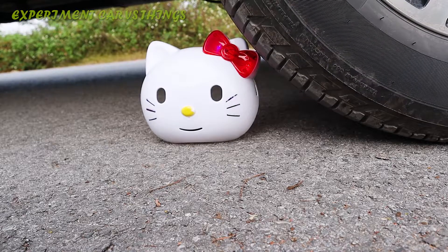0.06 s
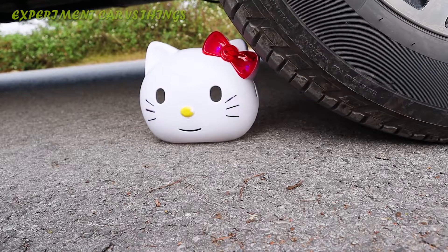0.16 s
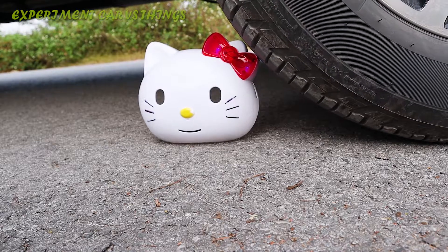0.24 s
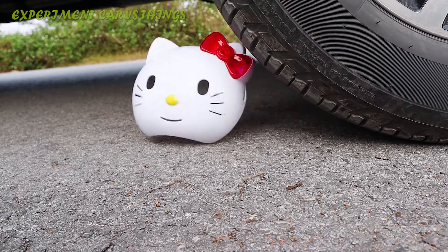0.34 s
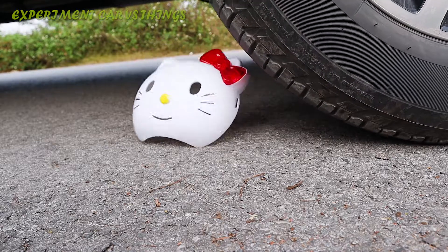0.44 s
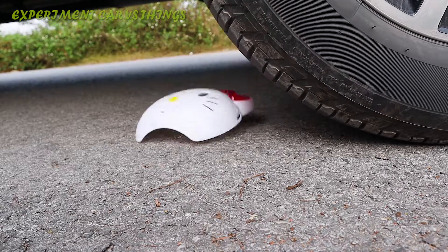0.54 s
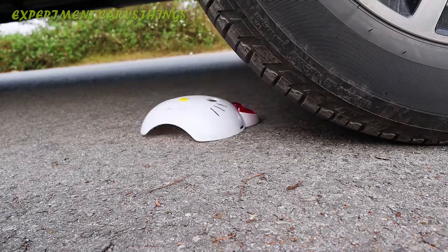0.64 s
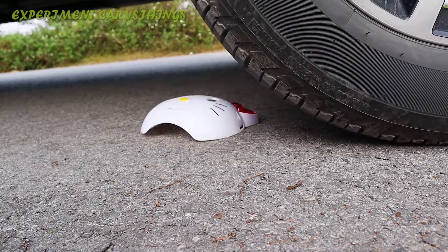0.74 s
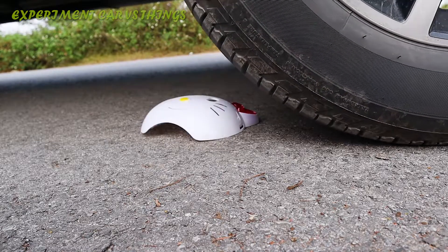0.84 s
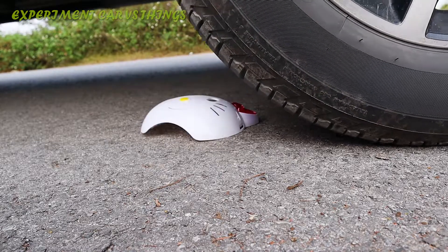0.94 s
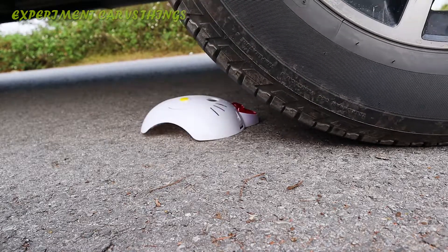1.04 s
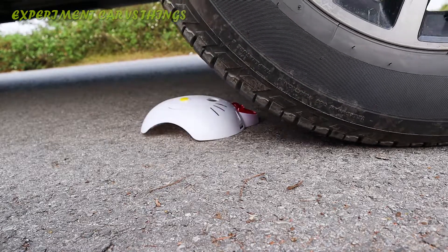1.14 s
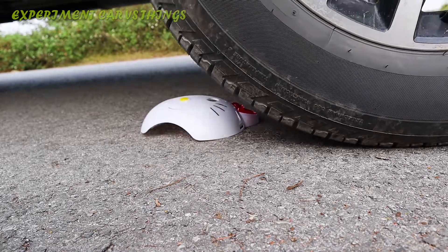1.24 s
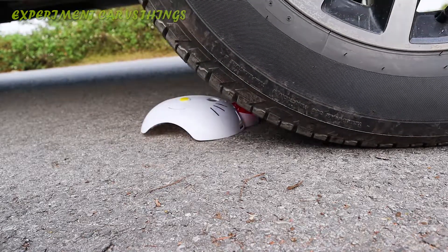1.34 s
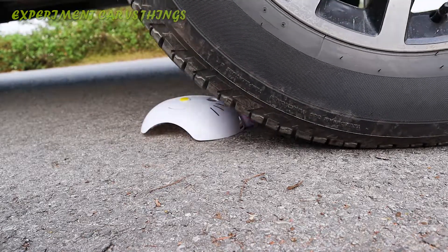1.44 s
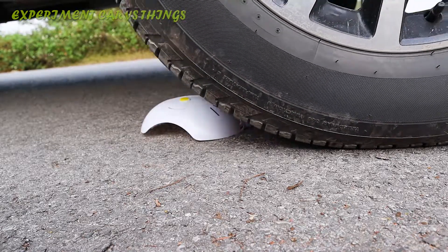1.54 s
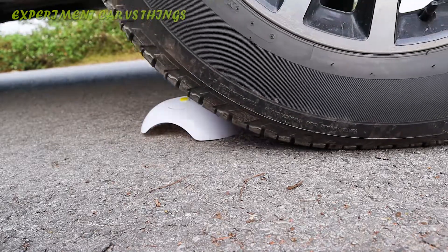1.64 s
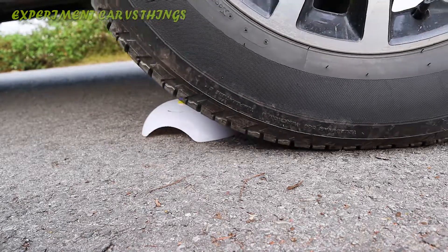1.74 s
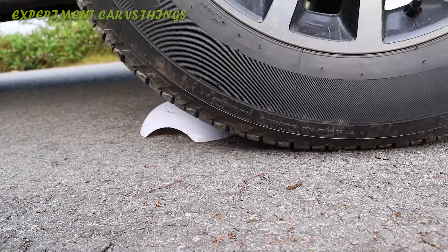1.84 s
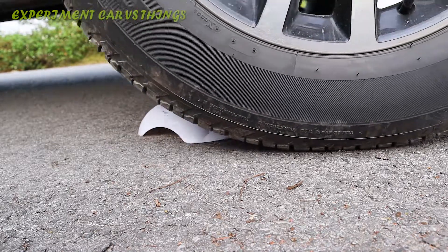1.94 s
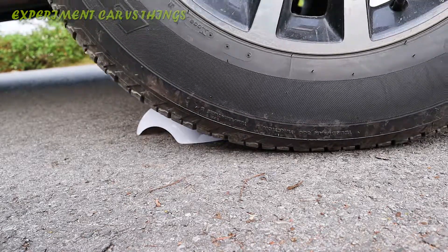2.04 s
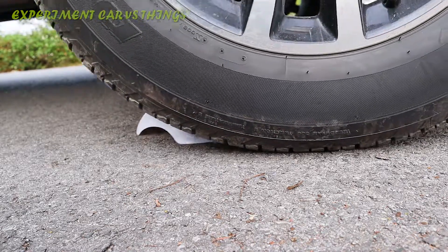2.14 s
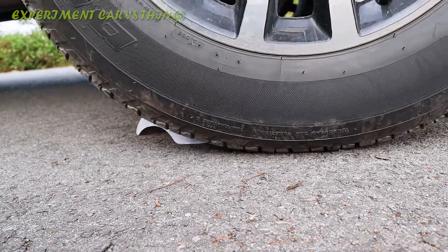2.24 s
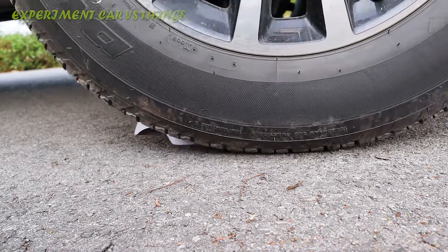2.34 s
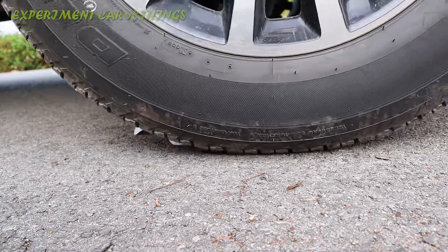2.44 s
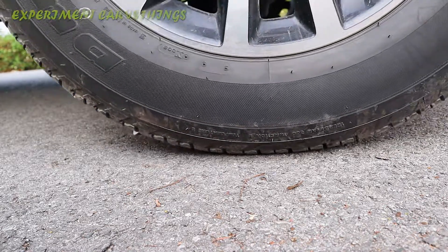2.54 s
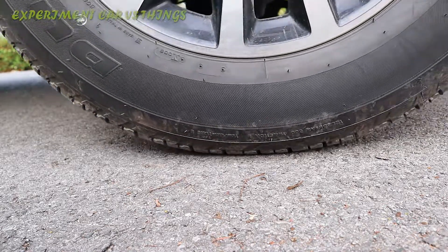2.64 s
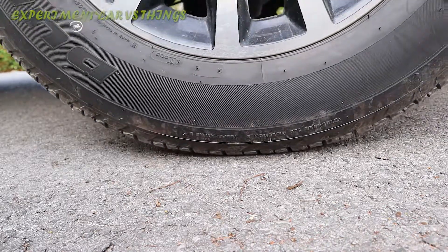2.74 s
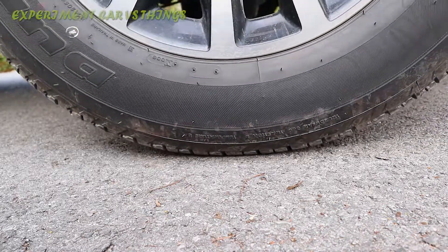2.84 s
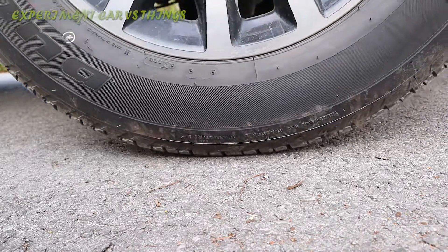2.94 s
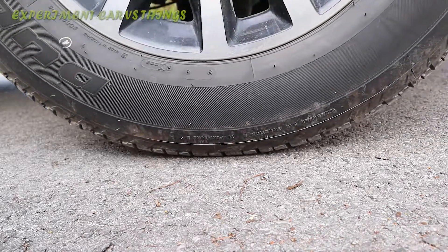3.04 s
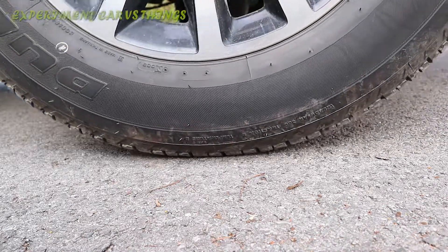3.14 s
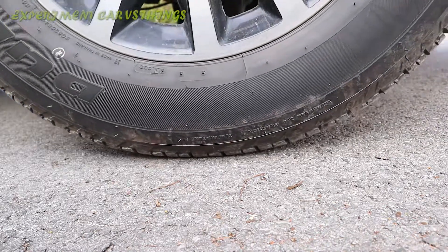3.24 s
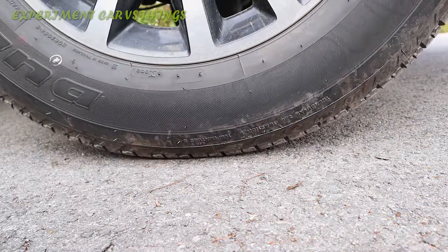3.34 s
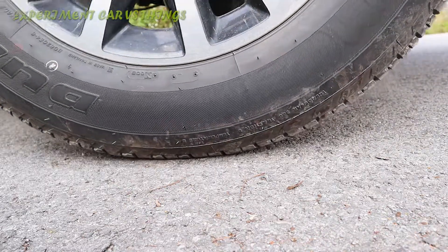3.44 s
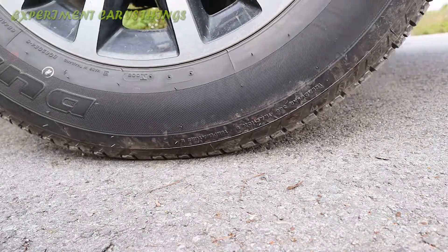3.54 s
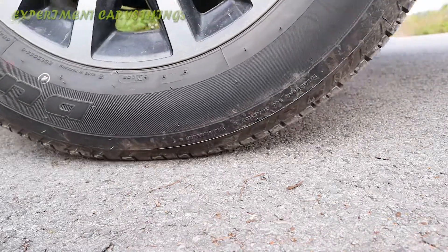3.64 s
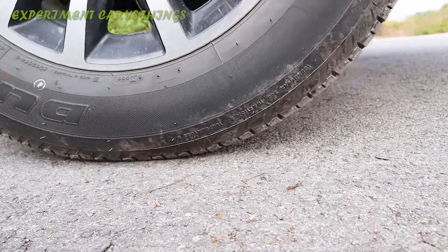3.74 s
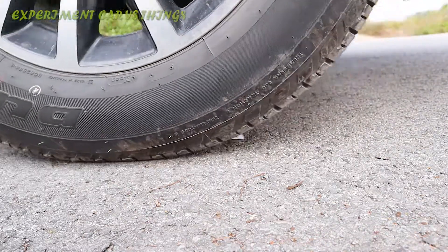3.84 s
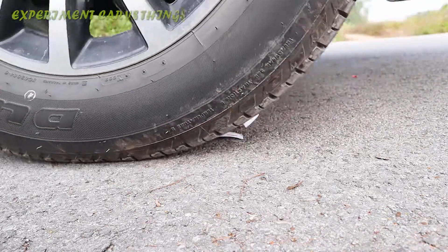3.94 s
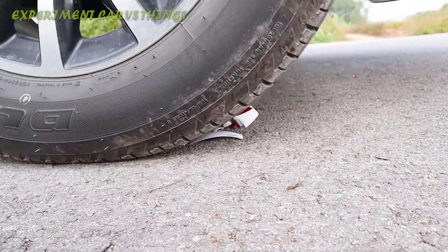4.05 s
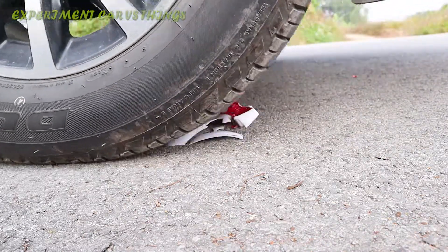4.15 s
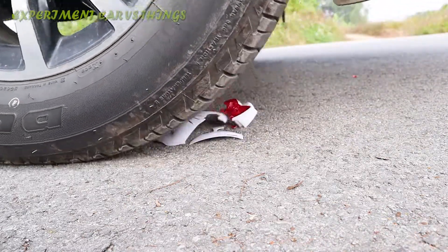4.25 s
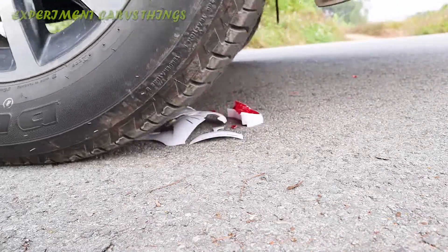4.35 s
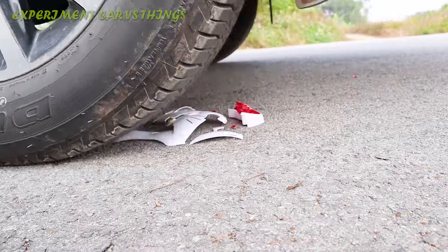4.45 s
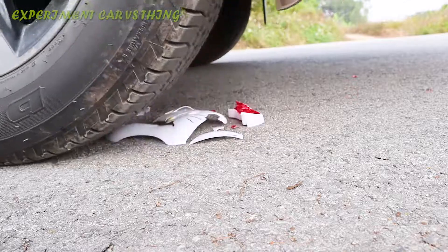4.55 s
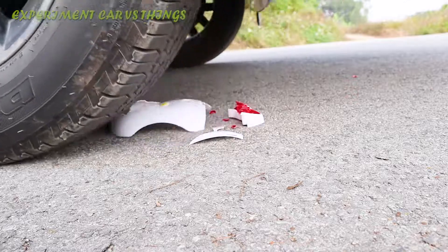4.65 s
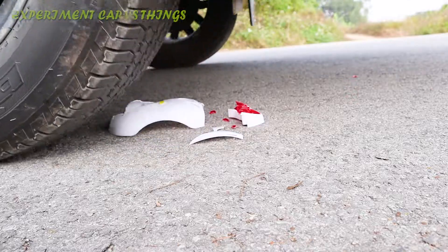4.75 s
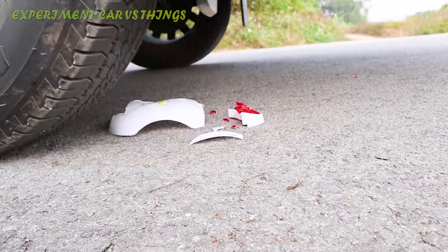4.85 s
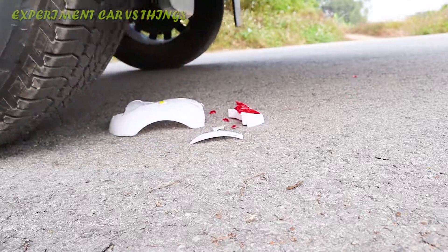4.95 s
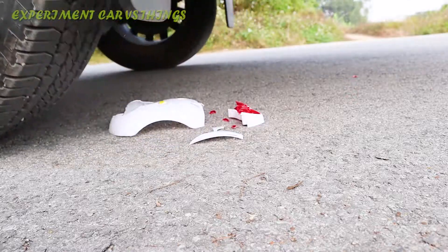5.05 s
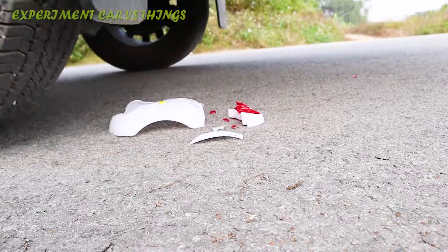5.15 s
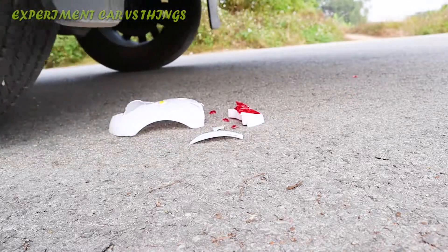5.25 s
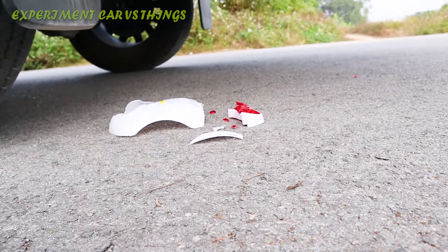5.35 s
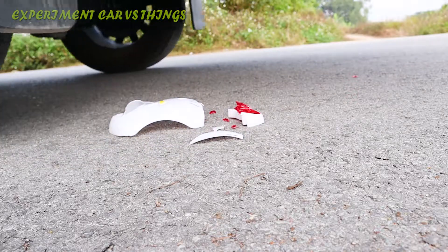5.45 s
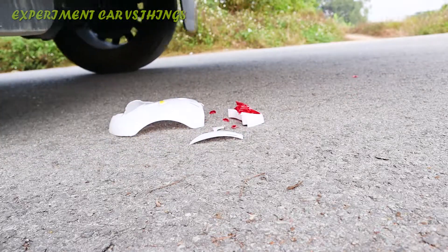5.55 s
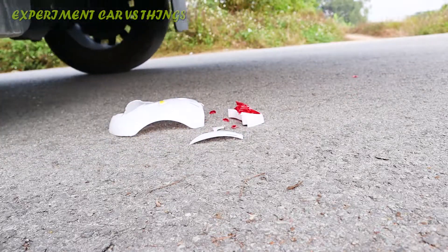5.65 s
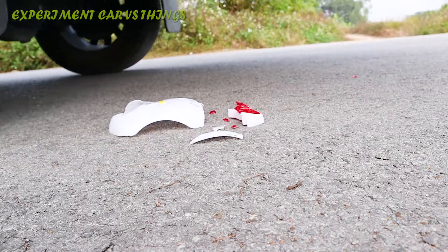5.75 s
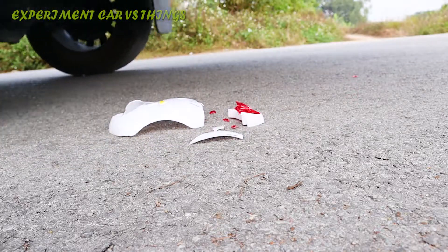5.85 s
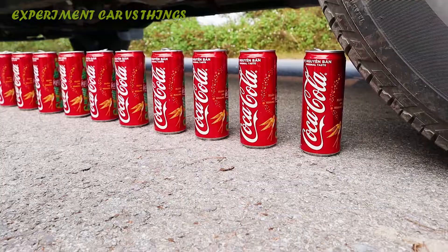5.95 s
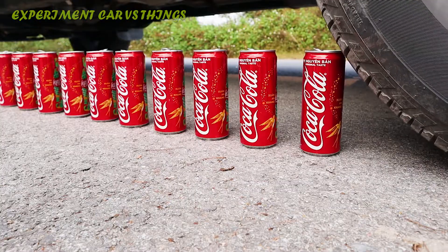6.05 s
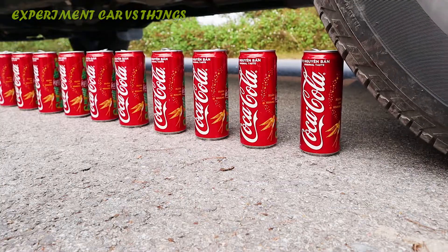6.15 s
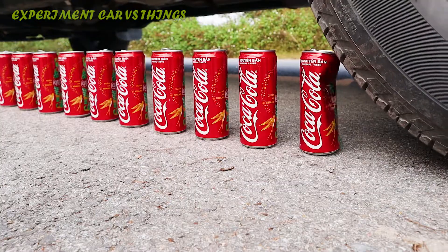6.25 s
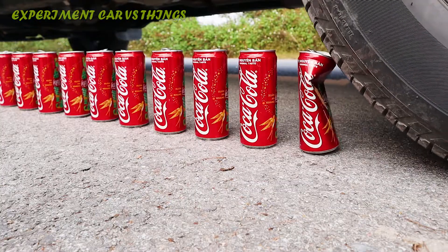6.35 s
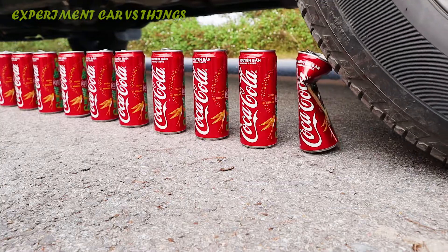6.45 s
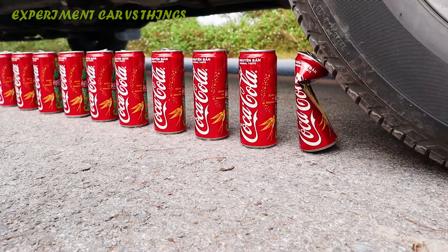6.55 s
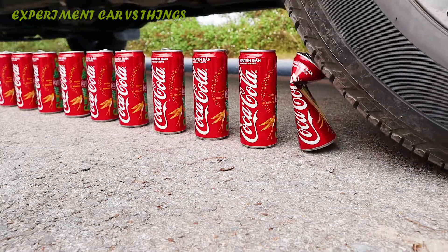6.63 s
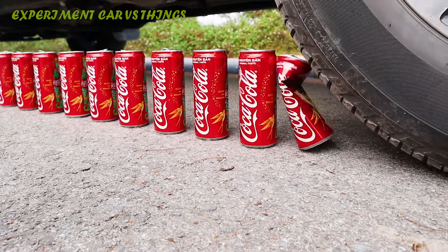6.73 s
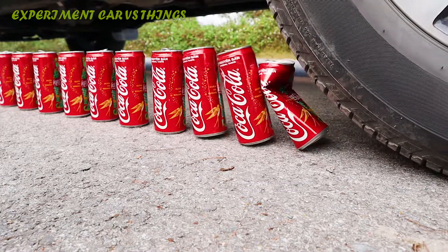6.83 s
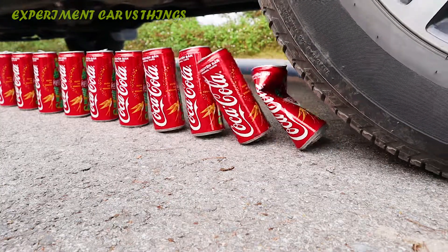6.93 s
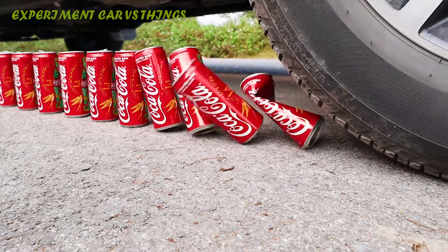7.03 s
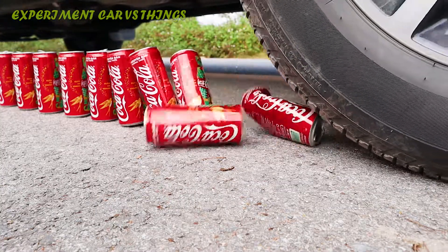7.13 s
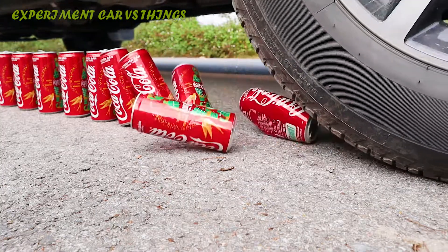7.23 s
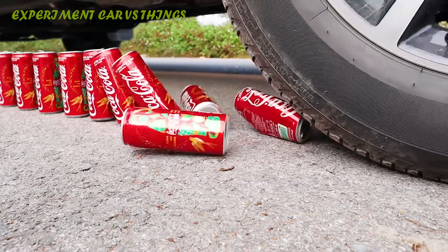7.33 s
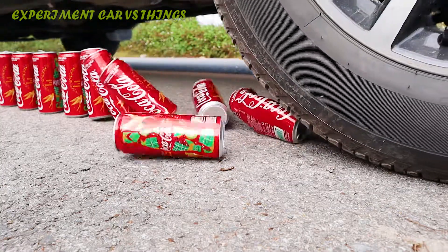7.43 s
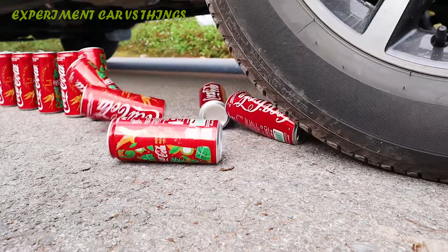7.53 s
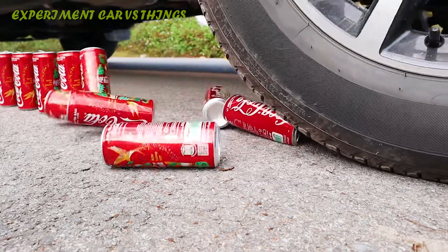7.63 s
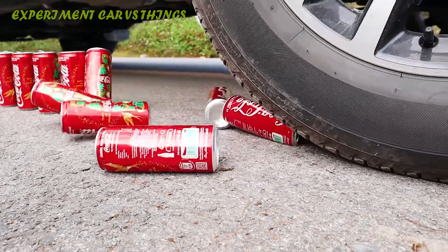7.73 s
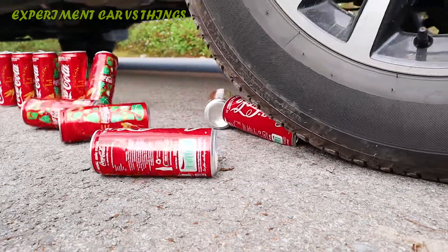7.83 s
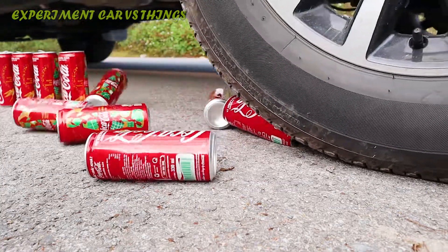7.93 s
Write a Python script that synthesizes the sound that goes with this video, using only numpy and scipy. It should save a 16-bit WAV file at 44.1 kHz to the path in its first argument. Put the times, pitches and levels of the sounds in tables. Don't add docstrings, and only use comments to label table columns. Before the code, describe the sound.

Very close under a slowly moving car outdoors: faint tread creaks, then a hollow plastic toy slips, drops and rocks. It bursts into dense brittle crunching, followed by separate hard snaps, small springing fragments and a short slide. After a quiet gap of faint traffic rumble, a thin can buckles and a row of empty cans topples, clanking and rolling with a tinny rattle.

```python
import sys
import numpy as np
from scipy import signal
from scipy.fft import rfft, irfft
from scipy.io import wavfile

SR = 44100
rng = np.random.default_rng(int(sys.argv[2]) if len(sys.argv) > 2 else 0)


def decibels_to_gain(level_db):
    exponent = np.asarray(level_db, float) / 20
    return 10 ** exponent


def to_wav(s):
    ch = np.atleast_2d(s).T
    pcm = np.round(np.clip(ch, -1, 1) * 32767)
    wavfile.write(sys.argv[1], SR, pcm.astype(np.int16))


N = 352224

# mode_hz, level_db, t60_s
CAN = [(368.8, -9.5, 0.21), (497.3, -3.5, 0.11), (517.3, -7, 0.092), (665, -9, .2), (807, -5.5, 0.155),
       (880, -13, 0.37), (1035, -5.5, 0.079), (1170, -6, 0.19), (1427, -8, 0.12), (1705, -8, 0.27),
       (1940, -12, 0.32), (2200, -3.5, 0.12), (2280, -5, 0.13), (3960, -7, 0.164)]


def in_time(rows):
    s, *columns = np.transpose(rows)
    t = np.arange(N) / SR
    return [np.interp(t, s, column, left=-150, right=-150) for column in columns]


def rms_one(x):
    return x / np.sqrt(np.mean(x ** 2) + 1e-20)


def colour(x, points, turn=None, size=4096):
    hz = np.maximum(np.fft.rfftfreq(size, 1 / SR), 1)
    point_hz, point_db = np.array(points)[:, 0], np.array(points)[:, 1]
    gain = decibels_to_gain(np.interp(np.log(hz), np.log(point_hz), point_db))
    if turn:
        return signal.fftconvolve(x, np.fft.fftshift(irfft(turn * gain)), "same")
    causal = np.r_[1, np.full(size // 2 - 1, 2), 1, np.zeros(size // 2 - 1)]
    cepstrum = irfft(np.log(gain)) * causal
    kernel = rms_one(irfft(np.exp(rfft(cepstrum))))[None] / np.sqrt(size)
    return signal.fftconvolve(x, kernel, axes=1)[:, :x.shape[1]]


def split(x, hz, kind):
    return signal.sosfilt(signal.butter(4, hz, kind, fs=SR, output="sos"), x)


def ring(clicks, hz, t60):
    r, w = decibels_to_gain(-60 / (t60 * SR)), 2 * np.pi * hz / SR
    first = np.argmax(clicks != 0)
    sine = signal.lfilter([0, np.sin(w)], [1, -2 * r * np.cos(w), r * r], clicks[first:] + 1e-18)
    return np.r_[np.zeros(first), sine]


def grains(per_s, spread_db, size):
    heights = decibels_to_gain(spread_db * np.minimum(rng.exponential(1, size), 4))
    heights = heights * rng.choice([-1, 1], size)
    return rms_one(heights * (rng.random(size) < per_s / SR))


def strike(modes, events, scatter_db, octave_db=0):
    events = np.array(events)
    luck = rng.standard_normal((len(events), len(modes)))
    at = (events[:, 0] * SR).astype(int)
    out = np.zeros(N)
    for k, (hz, level_db, t60) in enumerate(modes):
        octaves = np.abs(np.log2(events[:, 2] / hz)) if octave_db else 0
        clicks = np.zeros(N)
        clicks[at] = decibels_to_gain(events[:, 1] + level_db + scatter_db * luck[:, k] - octave_db * octaves)
        out += ring(clicks, hz, t60)
    return out


def stage(rows, t60, treble_db=None):
    tick_gap_s, tick_share = .0105, 0.8
    rows = np.array(rows)
    tick = np.r_[np.diff(rows[:, 0]), 1] < tick_gap_s
    treble = rows[:, 3] if treble_db is None else np.full(len(rows), treble_db)
    return np.c_[rows[:, :3], treble, t60 * np.where(tick, tick_share, 1)]


def breaks(events, spectrum, edge_hz, snap_db, splinter_db, treble_db, ring_db, turns, gain_db,
           burst_db, burst_s, steep, treble_loss_db, focus_db, sparkle_hz):
    span = 5120
    s, peak_db, hz, bright_db, t60 = np.transpose(events)[:, :, None, None]
    t = np.arange(span) / SR
    f = np.fft.rfftfreq(span, 1 / SR) + 1

    splinters = grains(3500, spread_db=2.5, size=(len(s), 2, span))
    decay = decibels_to_gain(splinter_db - 60 * t / np.clip(t60, .008, .13))
    burst = 1 + decibels_to_gain(burst_db - 60 * t / burst_s)
    force = decay * burst * splinters
    force[:, :, 0] += decibels_to_gain(snap_db) * rng.choice([-1, 1], (len(s), 2))

    heard = rfft(force) / (1 + 0.16 * hz / (1j * f)) ** 2
    heard *= 1 + decibels_to_gain(focus_db) / (1 + 1.6j * (f / hz - hz / f))
    above = 1j * f / (edge_hz * decibels_to_gain(0.071 * np.minimum(bright_db + 22.5, 0)))
    body = irfft(heard / (1 + above) ** steep)
    edge = irfft(heard * (1 - 1 / (1 + above) ** 2) / (1 + sparkle_hz / (1j * f)) ** 2)
    edge = edge * decibels_to_gain(bright_db + treble_db - treble_loss_db * t / t60)
    broad = colour((body + edge).reshape(-1, span), spectrum, size=2048).reshape(force.shape)

    snap = np.where(t < .0008, force, decibels_to_gain(-25.5) * force)
    piece = decibels_to_gain(-60 * t * hz / turns) * np.sin(2 * np.pi * hz * t)
    sound = broad + decibels_to_gain(ring_db) * irfft(rfft(snap) * rfft(piece))

    sound *= np.clip((span - 300 - np.arange(span)) / 800, 0, 1)
    straight_peak = np.abs(sound[:, :1]).max(axis=2, keepdims=True)
    sound *= decibels_to_gain(np.minimum(peak_db + gain_db, 3.5)) / straight_peak
    out = np.zeros((2, N + span))
    for start, one in zip((s.ravel() * SR).astype(int), sound):
        out[:, start:start + span] += one
    return out[:, :N]


def toy():
    # freq_hz, density_db (per Hz)
    plastic_spectrum = [(88, -37.5), (150, 0.5), (445, -0.5), (1020, -3), (1870, 0), (3760, -4.5),
                        (4930, -11.5), (9000, -18), (11800, -18.5), (15500, -27.5)]
    # time_s, level_db
    scrapes = [
        [(0.39, -53.5), (0.412, -17.5), (0.47, -67.5)],
        [(1.93, -48), (2.05, -43.5), (2.25, -48), (2.36, -35.5), (2.48, -41.5), (2.62, -39.5), (2.7, -58.5)],
        [(3.85, -49.5), (4.0, -34), (4.1, -67)],
        [(4.1, -68), (4.2, -66), (4.29, -51.5), (4.335, -35)],
        [(4.64, -47), (4.724, -23.5), (4.86, -102)],
    ]
    # mode_hz, level_db, t60_s
    shell = [(400, -14, .04), (760, -5, .05), (870, -1, .06), (920, -2, .05), (1040, -6, .04),
             (1830, -9, .03)]
    events = cracks()
    out = breaks(events, plastic_spectrum, edge_hz=3570, snap_db=10, splinter_db=-11.0, treble_db=17.0,
                 ring_db=-8, turns=13, gain_db=-1.5, burst_db=1.5, burst_s=0.027, steep=1.09,
                 treble_loss_db=9, focus_db=1.5, sparkle_hz=1500)
    drag = sum(decibels_to_gain(in_time(part)[0]) for part in scrapes)
    grit = colour(grains(1500, spread_db=4.5, size=(2, N)), plastic_spectrum)
    out += drag * decibels_to_gain(-6.5) * rms_one(split(split(grit, 700, "high"), 7700, "low"))
    shell_from_s, shell_to_s, shell_db = .57, .9, -5
    rocking = [e for e in events if shell_from_s < e[0] < shell_to_s]
    out[0] += decibels_to_gain(shell_db) * strike(shell, rocking, scatter_db=2, octave_db=12.5)
    return out


def cracks():
    # start_s, peak_db, pitch_hz, treble_db, t60_s
    slips = [(0.2502, -26, 1060, -40, 0.048), (0.3937, -29.5, 900, -28.5, 0.038),
             (0.4059, -15, 1920, -20.5, 0.12), (0.415, -17, 1410, -10.5, 0.066),
             (0.4215, -19.5, 1810, -17.5, 0.03), (0.43, -12.5, 1390, -24.5, .05),
             (0.4856, -16.5, 690, -28.5, 0.045), (0.4991, -17.5, 1820, -24.5, 0.055),
             (0.5057, -19.5, 1920, -21, 0.026), (0.515, -25.5, 455, -45.5, 0.038),
             (0.561, -37, 2500, -27.5, 0.044), (0.5798, -11.5, 1050, -37.5, 0.023),
             (0.592, -33, 4300, -18.5, .03), (0.612, -31.5, 1500, -29, 0.043),
             (0.6572, -12, 900, -33, 0.053), (0.666, -8, 860, -32, 0.083), (0.6748, 1, 1900, -25.5, 0.088),
             (0.683, 2.5, 2100, -24.5, 0.043), (0.69, -8, 900, -27, .05), (0.7032, -12.5, 820, -27, 0.14),
             (0.74, 3.5, 3100, -10.5, 0.014), (0.7585, -5, 1900, -24, 0.034),
             (0.7694, -13, 764, -26.5, 0.1), (0.782, -14.5, 1900, -26.5, 0.036),
             (0.7995, -17.5, 820, -37, 0.056), (0.808, -20.5, 776, -48, 0.045),
             (0.822, -25.5, 798, -40, 0.04), (1.2315, -45, 2200, -31, 0.055)]
    # start_s, peak_db, pitch_hz, treble_db, t60_s
    crush = [(1.762, -41, 2480, -18.5, .04), (1.78, -19, 780, -39, 0.17),
             (1.808, -17.5, 740.6, -43.5, 0.068), (1.816, -2, 1022, -39.5, 0.0089),
             (1.8247, 1.5, 2660, -17, 0.063), (1.922, -32.5, 1200, -39.5, 0.032),
             (1.93, -21.5, 2500, -24, 0.018), (1.9361, 1, 730, -35, 0.039), (1.9441, 8, 1990, -20.5, 0.024),
             (1.9687, 8.5, 1891, -9.5, 0.047), (1.9719, 3, 1070, -23.5, 0.074),
             (2.055, -22.5, 2500, -17, .02), (2.056, -1, 2470, -13.5, 0.088), (2.0714, 5, 1960, -15, 0.063),
             (2.075, 5.5, 2460, -14, 0.052), (2.117, -10, 1102, -36.5, 0.048), (2.162, 4, 1740, -9, 0.054),
             (2.187, 1, 2260, -12.5, 0.085), (2.2581, -2.5, 3800, -10, 0.016),
             (2.265, -7, 3370, -16.5, 0.087), (2.289, -16, 3700, -21, 0.081), (2.311, -11, 2650, -22, .02),
             (2.315, -2, 1700, -24, 0.082), (2.3233, 5, 910, -10.5, 0.063),
             (2.37, -13.5, 563, -26.5, 0.013), (2.3733, 14, 2730, -21.5, 0.062),
             (2.4135, -3, 2150, -13.5, 0.077), (2.4439, -6.5, 2480, -15, 0.078),
             (2.459, -28.5, 1800, -28, 0.017), (2.4853, -19, 1800, -38, 0.021),
             (2.4939, 9, 2130, -18, 0.03), (2.5505, 5, 1570, -10, 0.058), (2.6031, -4, 2286, -21, 0.074),
             (2.6408, -11.5, 992, -42.5, 0.037)]
    # start_s, peak_db, pitch_hz, treble_db, t60_s
    snaps = [(2.7473, 3.5, 2157, -42, 0.081), (2.755, 4, 883, -4.5, 0.058), (2.9318, -23, 4600, 19, 0.1),
             (3.1221, 0.5, 1690, -11.5, 0.0049), (3.1272, -4.5, 1470, 6, 0.076),
             (3.1687, 0.5, 3970, -14.5, 0.11), (3.2428, -6, 3310, -97.5, 0.13),
             (3.273, -16.5, 1180, -31.5, 0.077), (3.403, 9.5, 1720, -19, 0.085), (3.408, 5.5, 2325, -12, 1),
             (3.505, -18, 1170, -22, 0.15), (3.521, -22, 900, -2.5, 0.41), (3.5646, -24, 1300, -6, 0.94),
             (3.652, -12, 4030, -29.5, 0.022), (3.6564, 1.5, 4025, -26.5, 0.17),
             (3.686, 3, 4250, -7, 0.073), (3.688, -5.5, 510, -49, 0.2), (4.3432, 2.5, 2900, 4, 0.022),
             (4.347, 4, 1950, -11.5, 0.066), (4.354, -15.5, 817, -35, 0.029)]
    # start_s, peak_db, pitch_hz, treble_db
    springs = [(3.8268, -28, 2270, -11), (3.8638, -25.5, 2490, -39), (3.8928, -25.5, 2670, -17),
               (3.928, -16.5, 4370, -6.5), (3.9477, -15, 4790, -2), (3.9697, -11.5, 1400, -6.5),
               (3.9755, -11.5, 2290, -29.5), (3.9933, -11, 3140, -30.5), (3.999, -13, 3400, -1),
               (4.0245, -22, 3630, 0.5), (4.055, -39, 3380, -21), (4.0675, -34, 3610, -7),
               (4.14, -36.5, 3800, -31), (4.196, -41, 3060, -16), (4.257, -29.5, 2160, -18),
               (4.279, -20, 3590, -16), (4.3114, -22, 2400, -11.5), (4.4399, -20, 4200, 10),
               (4.49, -35, 3500, -14), (4.5311, -32.5, 2360, -13.5), (4.9169, -33.5, 2470, -14),
               (5.3427, -42, 1400, -1)]
    # start_s, peak_db, pitch_hz
    slide = [
        (4.6245, -40, 1117),
        (4.6652, -39, 518),
        (4.6789, -21, 3550),
        (4.6901, -19.5, 3760),
        (4.6953, -16.5, 1630),
        (4.7241, -15, 1950),
        (4.7381, -19, 910),
        (4.7735, -17.5, 1170),
        (4.8098, -48, 944),
        (4.8299, -29.5, 1450),
    ]
    return np.r_[slips, crush, snaps, stage(springs, t60=.04), stage(slide, t60=.12, treble_db=-23.0)]


def cans():
    # freq_hz, density_db (per Hz)
    metal_spectrum = [(88, -59), (150, -39), (330, -15.5), (765, -5.5), (1800, -4.5), (3500, -4.5),
                      (5200, -11), (11400, -20.5), (15500, -36)]
    # time_s, vigour_db
    rolling = [
        [(6.5, -52), (6.565, -45), (6.58, -40), (6.63, -49.5), (6.68, -74), (6.73, -49), (6.76, -47),
         (6.795, -46.5), (6.82, -31.5)],
        [(6.815, -36), (6.825, -12), (6.9, -20.5), (7.008, -25), (7.13, -18), (7.192, -12.5), (7.36, -16),
         (7.49, -15.5), (7.56, -21), (7.987, -22.5)],
    ]
    # mode_hz, level_db, t60_s
    creased = [(750, -1, 0.15), (1020, -3, 0.045), (1250, -11.5, 0.096), (1800, -15, 0.137),
               (2930, -21, 0.12), (3900, -24, .06)]
    # mode_hz, level_db, t60_s
    folded_modes = [(480, 8, 0.21), (1015, -1, 0.16), (1450, -7, 0.088), (2250, -23, 0.11),
                    (2680, -16, 0.13), (3950, -18, 0.071)]
    events = knocks()
    out = breaks(events, metal_spectrum, edge_hz=4500, snap_db=-5, splinter_db=-17.5, treble_db=23.0,
                 ring_db=-10.5, turns=28, gain_db=-3.0, burst_db=-23.0, burst_s=0.094, steep=3.46,
                 treble_loss_db=14, focus_db=-10.5, sparkle_hz=7140)

    creak, roll = (decibels_to_gain(in_time(part)[0]) for part in rolling)
    body = creak + roll
    rattle_at_db, rattle_grows = -10, 2
    treble = decibels_to_gain(rattle_at_db) * (body / decibels_to_gain(rattle_at_db)) ** rattle_grows
    patter = colour(grains(900, spread_db=0.0, size=(2, N)), metal_spectrum)
    out += body * decibels_to_gain(-13) * rms_one(split(patter, 2800, "low"))
    out += treble * decibels_to_gain(-11.5) * rms_one(split(split(patter, 2100, "high"), 7800, "low"))

    fold_s = 6.68
    folded = np.arange(N) > fold_s * SR
    rolled = patter_into(CAN, roll, 4000, patchy_db=9.0, detune=0.03025)
    creasing = patter_into(creased, creak * ~folded, 900, patchy_db=-4.0, detune=0.0087)
    folding = patter_into(folded_modes, creak * folded, 890, patchy_db=-16.5, detune=0.0067)
    rolled += decibels_to_gain(3.0) * (creasing + folding)
    out += creak * folded * decibels_to_gain(-11.0) * rms_one(split(patter, 1050, "high"))

    walls_from_s = 6.5
    loose = [e for e in events if e[0] > walls_from_s]
    walls = decibels_to_gain(1.0) * split(rolled, 2700, "low")
    walls += decibels_to_gain(-19) * strike(CAN, loose, scatter_db=6.0, octave_db=17.0)
    walls += dents(np.array(loose), level_db=-16.5, scatter_db=24.0)
    out += walls * decibels_to_gain(np.array([[0], [-4]]))
    return split(out, 193, "high")


def knocks():
    # start_s, peak_db, pitch_hz, treble_db
    buckles = [
        (6.1425, -40, 540, -27.5),
        (6.3078, -1.5, 443, -63),
        (6.3159, 2, 600, -24.5),
        (6.322, 0.5, 774, -23),
        (6.3523, -7.5, 480, -21.5),
        (6.3903, -4.5, 1250, -20.5),
        (6.573, -38, 1020, -59),
    ]
    # start_s, peak_db, pitch_hz, treble_db, t60_s
    topples = [(6.8232, -0.5, 506, -23.5, 0.04), (6.834, -5, 1450, -39, 0.11),
               (6.8436, -11, 578, -31, 0.072), (6.8736, -12.5, 600, -17.5, 0.12),
               (6.92, -20.5, 395, -8, 0.075), (6.9285, -22, 880, -24, 0.12), (6.943, -18, 2250, 6, 0.22),
               (6.9715, -15, 485, -43, 0.038), (7.009, -21.5, 544, -20, 0.086),
               (7.031, -19, 477, -42, 0.087), (7.061, -15.5, 670, -22, 0.073),
               (7.0692, -22, 2280, -65, 0.17), (7.1156, -11.5, 1810, -28, 0.17),
               (7.142, -10.5, 486, -29, 0.15), (7.1562, -3.5, 672, -29.5, 0.17),
               (7.185, -14.5, 460, -40, 0.14), (7.205, -5.5, 2200, -43, 0.13),
               (7.2323, 1, 508, -15.5, 0.099), (7.252, 0.5, 2270, -37, 0.072),
               (7.2652, -1, 2160, -38.5, 0.16), (7.284, -5, 1275, -29.5, 0.15),
               (7.3293, -6.5, 2250, -29, 0.08)]
    # start_s, peak_db, pitch_hz, treble_db, t60_s
    bounces = [(7.3908, -7, 1740, -15, 0.025), (7.3947, -8.5, 2040, -14, 0.18),
               (7.417, -5.5, 1730, -30, 0.15), (7.4425, -11, 482, -35, 0.15), (7.4791, -9, 1980, -33, 0.17),
               (7.494, -11, 473, -24, 0.13), (7.516, -23, 6250, -3, 0.048), (7.5445, -7, 1730, -29, 0.046),
               (7.5523, -5, 950, -16.5, 0.31), (7.583, -1.5, 4090, -7, 0.086),
               (7.615, -21.5, 2340, 3, 0.14), (7.659, -11, 2100, -6, 0.096), (7.6909, -7.5, 900, -12, 0.26),
               (7.733, -7.5, 963, -8.5, 0.44), (7.7767, -6, 2200, -27, 0.16), (7.789, -12, 680, -26, 0.11),
               (7.8033, -14, 432, -19.5, 0.061), (7.823, -15, 2243, -39, 0.025), (7.84, -5, 1010, 0, 0.056),
               (7.86, -9.5, 500, -38, 0.15), (7.896, 1, 2370, 12, 0.026), (7.907, 2, 1006, -11, 0.095),
               (7.966, -13, 2280, -1.5, 0.08), (7.985, -15, 1020, -11, 0.099)]
    return np.r_[stage(buckles, t60=.08), topples, bounces]


def dents(events, level_db, scatter_db, count=12):
    low_hz, high_hz, t60_s = 900, 5630, 0.077
    t = np.arange(SR // 4) / SR
    out = np.zeros(N + SR)
    draws = rng.random((len(events), 2, count, 1))
    for (s, peak_db, hz, *_), (place, luck) in zip(events, draws):
        panels = np.r_[[[hz]], low_hz * (high_hz / low_hz) ** place[1:]]
        loss_db = scatter_db * np.r_[[[0]], luck[1:]]
        fade_db = 60 * t / t60_s * (panels / 2000) ** 0.11
        sines = decibels_to_gain(peak_db + level_db - loss_db - fade_db) * np.sin(2 * np.pi * panels * t)
        out[int(s * SR):][:len(t)] += np.sum(sines, axis=0)
    return out[:N]


def patter_into(modes, vigour, per_s, patchy_db, detune):
    grit = vigour * (vigour > 1e-5) * grains(per_s, spread_db=4.0, size=N)
    dealt = rng.integers(0, 2 * len(modes), N)
    turning = rng.standard_normal((2 * len(modes), 121))
    out = 0
    for k, (hz, db, t60) in enumerate(modes + modes):
        sway = np.tanh(np.interp(np.linspace(0, 120, N), np.arange(121), turning[k]))
        hits = grit * decibels_to_gain(db + patchy_db * sway) * (dealt == k)
        pitch = hz * (1 + detune * (k >= len(modes)))
        out = out + ring(hits, pitch, t60) / np.sqrt(t60 * SR / 14)
    return out


def hollows():
    # mode_hz, level_db, t60_s
    pinned = [(486, 1, 0.092), (1062, -2.5, 0.093), (1243, -3, .15), (1900, -6.5, 0.046), (2200, -8, 0.14),
              (2700, -4.5, 0.085), (3210, -5.5, 0.091), (4050, 2.5, 0.085), (4540, 3, 0.056)]
    # start_s, peak_db, pitch_hz
    pops = [
        (6.155, -49, 600),
        (6.265, -54, 2250),
        (6.317, -36, 2280),
        (6.351, -17.5, 1900),
        (6.391, -23.5, 1320),
        (6.393, -17, 2960),
    ]
    # mode_hz, level_db, t60_s
    flat = [(517.4, -10, .08), (680, -2.5, 0.065), (810, 1, 0.098), (1130, -2, 0.097), (1500, -2.5, 0.13)]
    # start_s, peak_db, pitch_hz
    drums = [
        (2.326, -24.5, 800),
        (3.169, -19.5, 700),
        (3.243, -24, 810),
        (3.274, -39, 810),
        (3.404, -17.5, 950),
        (3.687, -23, 650),
    ]
    # start_s, peak_db, pitch_hz
    clanks = [
        (7.186, -14, 500),
        (7.25, -12, 2230),
        (7.372, -17, 500),
        (7.392, -8, 1680),
        (7.444, -12, 490),
        (7.40, -13.5, 3900),
    ]
    out = strike(pinned, pops, scatter_db=2, octave_db=13)
    out = out + strike(flat, drums, scatter_db=2, octave_db=14.0)
    return out + strike(CAN, clanks, scatter_db=2, octave_db=58)


def tyre():
    # start_s, peak_db, wheel_blow_db
    thuds = [(0.25, -22.5, -44.5), (0.406, -8, -44.5), (1.965, -43, -4.5), (2.07, 4, -5.5),
             (2.49, -21.5, -29), (2.747, -38.5, -33.5), (3.402, -10, -6.5), (3.686, -38, -2),
             (3.72, -11, -3), (4.344, -10, -14.5), (6.309, -35.5, -6.5), (7.233, -53.5, -16),
             (7.907, 1, -12), (7.963, -9.5, 9)]
    # mode_hz, level_db, t60_s
    wheel_modes = [(193.6, -32.5, 2.98), (198.6, -57, 2.3), (259.5, -28, 0.23), (406, -35, 0.15),
                   (597, -31, 0.1), (820, -38.5, 0.41)]
    # mode_hz, level_db, t60_s
    rim = [(580, -2, 0.36), (820, -4.5, 0.3)]
    # start_s, peak_db
    rim_blow = [
        (3.7, -31),
    ]
    # mode_hz, level_db, t60_s
    tread = [(6150, -2, 0.0067), (7500, 1, 0.0053), (11700, -2, 0.004), (3300, -10, .004)]
    # start_s, peak_db
    creaks = [(0.0054, -61), (0.0144, -60), (0.0304, -65), (0.0384, -61), (0.0568, -57), (0.0664, -62),
              (0.0764, -62), (0.0894, -63), (0.1087, -61), (0.1446, -54), (0.1625, -58), (0.1774, -57),
              (0.1894, -62), (0.2029, -58), (0.2164, -61), (0.2264, -59), (0.2374, -59), (6.0442, -65),
              (6.147, -60), (6.2297, -56), (6.2615, -53)]
    wheel_to_s = 4.0
    push_modes = [(50.4, -6.0, 0.077), (107, -8.0, 0.0022), (204, -2.0, 0.0076)]   # mode_hz, level_db, t60_s
    push = strike(push_modes, thuds, scatter_db=1)
    blows = [(s, blow_db) for s, db, blow_db in thuds if s < wheel_to_s]
    wheel = strike(wheel_modes, blows, scatter_db=1)
    sung = strike(rim, rim_blow, scatter_db=1)
    return split(push, 96, "high") + wheel + sung + decibels_to_gain(-2) * strike(tread, creaks, scatter_db=1.5)


def under_car(x, t60, dull_hz):
    t = np.arange(int(.4 * SR)) / SR
    tail = rng.standard_normal((2, len(t))) * decibels_to_gain(-60 * t / t60) * np.clip(t / 0.002, 0, 1)
    tail = signal.lfilter([1], [1, -np.exp(-2 * np.pi * dull_hz / SR)], tail)
    return signal.fftconvolve(x[None], tail / np.sqrt(np.sum(tail[0] ** 2)))[:, :N]


def background():
    # time_s, level_db
    air = [(0, -47), (1.6, -49), (3.0, -49.5), (4.2, -53.5), (5.0, -56.5), (5.6, -48), (6.1, -47),
           (6.5, -47), (7.99, -47)]
    # freq_hz, density_db (per Hz)
    rumble_spectrum = [(20, -15.5), (35, -2), (54, 7), (81, -2.5), (150, -8.5), (220, -11.5), (290, -47),
                       (480, -120)]
    # freq_hz, density_db (per Hz)
    hiss_spectrum = [(120, -20.5), (200, -3.5), (467, -5.5), (1040, -15), (3010, -22.5), (3940, -26.5),
                     (12300, -40.5), (15000, -54.5)]
    # freq_hz, ratio_db
    side_air = [(60, -34), (180, -14.5), (550, -0.5), (1650, 5), (4970, 8), (15000, 12)]
    rumble_db, = in_time(air)
    hiss_db = -55.5 + 0.48 * (rumble_db + 52.5)
    rumble = rms_one(colour(rng.standard_normal((2, N)), rumble_spectrum))
    hiss = rms_one(colour(rng.standard_normal((2, N)), hiss_spectrum))
    mid, stray = decibels_to_gain(rumble_db - 3.5) * rumble + decibels_to_gain(hiss_db - 7.0) * hiss
    return np.array([mid, colour(stray, side_air, turn=0.84)])


def scene():
    # freq_hz, ratio_db
    side_near = [(60, -9.5), (150, -27.5), (380, -16), (950, -6.5), (2380, -2), (5980, 2.5), (15000, 9)]
    plastic, metal = toy(), cans()
    near = plastic + metal
    cover = np.interp(np.arange(N) / SR, [1.0, 1.7], decibels_to_gain([-27, -21]))
    near += under_car(cover * near[0], t60=0.24, dull_hz=3100)
    wheel = tyre()
    near[0] += wheel
    near += split(hollows(), 330, "high") * decibels_to_gain(np.array([[0], [-6]]))
    turned = colour(near[0] - 1.2 * metal[0], side_near, turn=1j)
    side = turned * decibels_to_gain(-20.0) + colour(near[1], side_near, turn=0.98) * decibels_to_gain(-2.0)
    side += decibels_to_gain(-21.0) * colour(wheel, [(20, 0.011), (20000, 0.0037)], turn=1j)
    mid, side = np.array([near[0], side - 0.17 * metal[0]]) + background()
    return np.array([mid + side, mid - side])


def low_pass(x):
    return signal.sosfilt(signal.butter(12, 15640, fs=SR, output="sos"), x)


def record(dry):
    limited = np.clip(dry, -1.15, 1.15)
    top_cut = signal.cheby2(10, 60, 15700, fs=SR, output="sos")
    mix = signal.sosfilt(top_cut, limited)
    return low_pass(mix)


dry = scene()
out = record(dry)
to_wav(out)
```